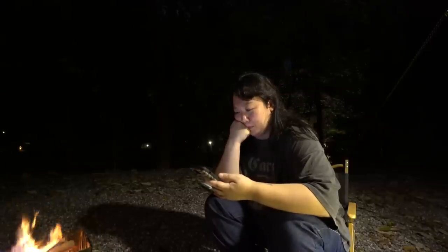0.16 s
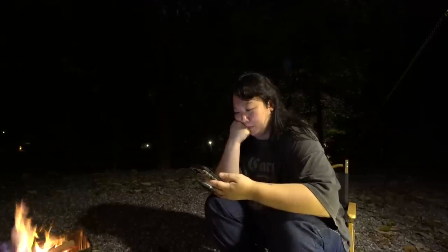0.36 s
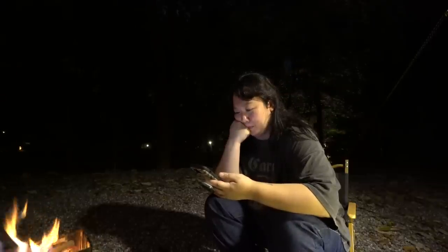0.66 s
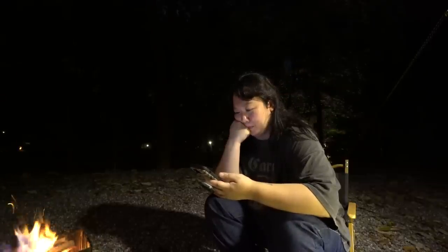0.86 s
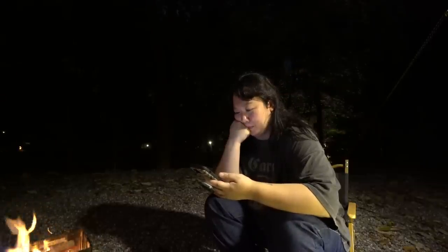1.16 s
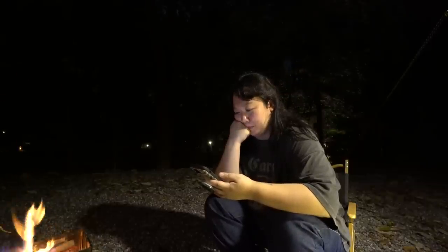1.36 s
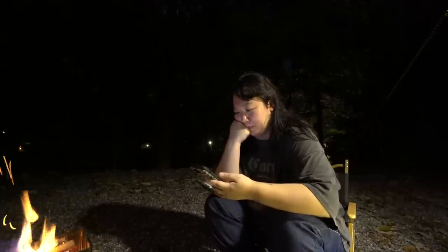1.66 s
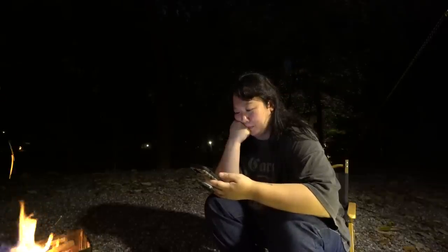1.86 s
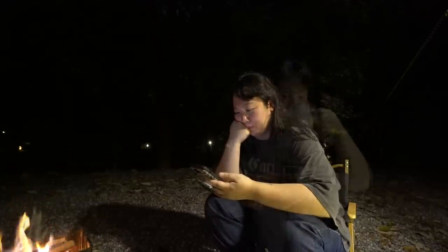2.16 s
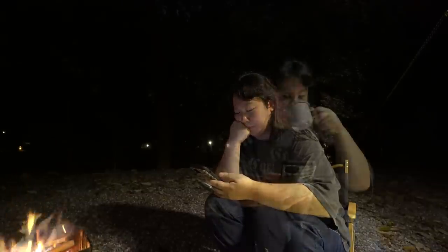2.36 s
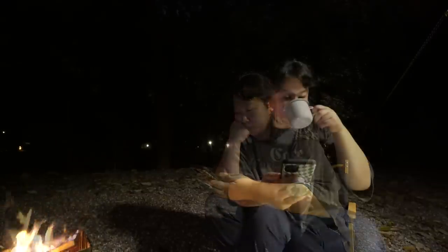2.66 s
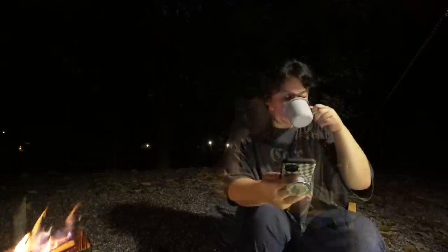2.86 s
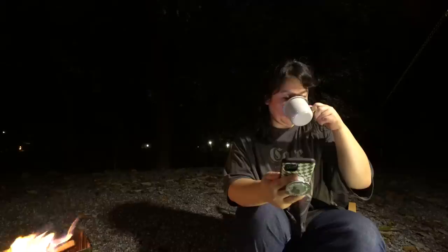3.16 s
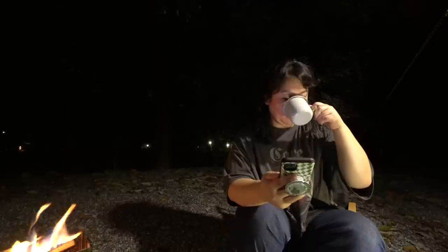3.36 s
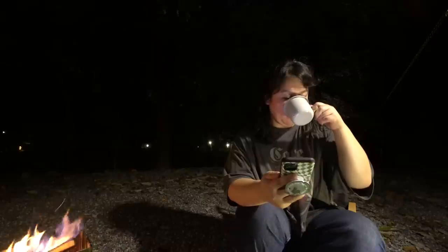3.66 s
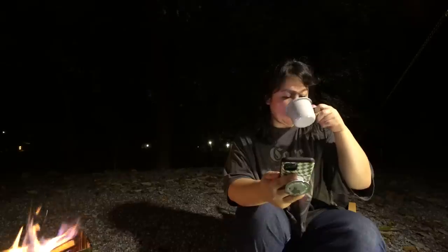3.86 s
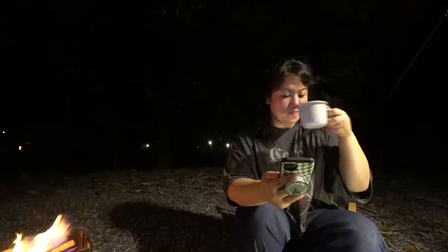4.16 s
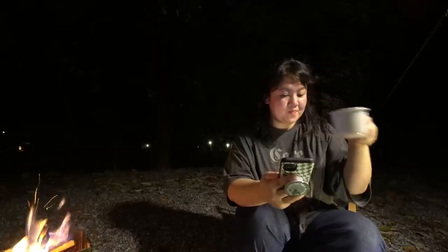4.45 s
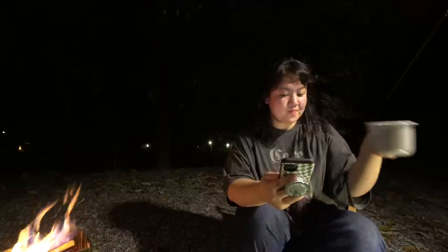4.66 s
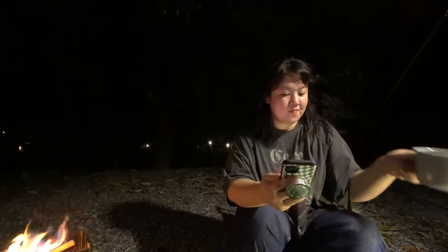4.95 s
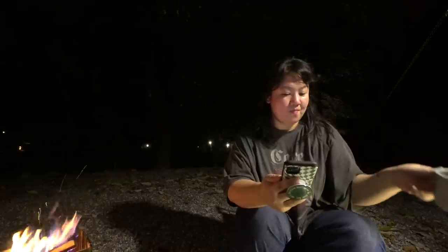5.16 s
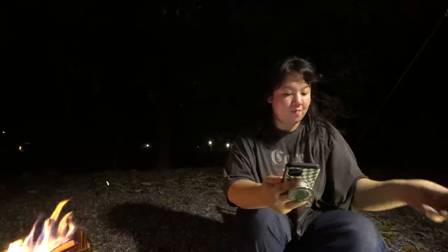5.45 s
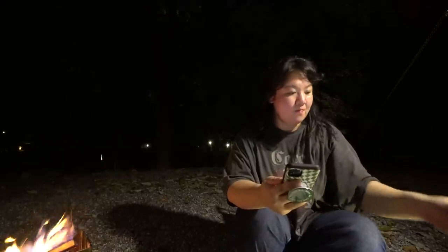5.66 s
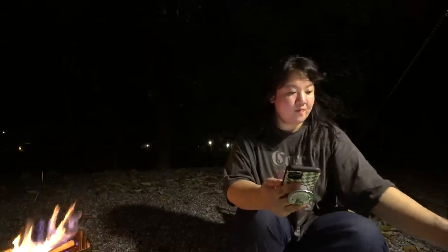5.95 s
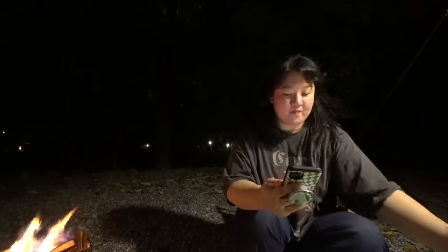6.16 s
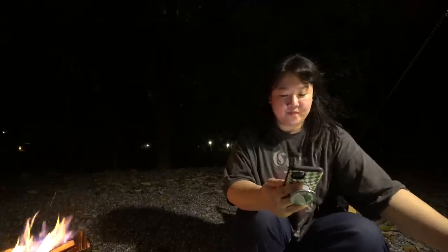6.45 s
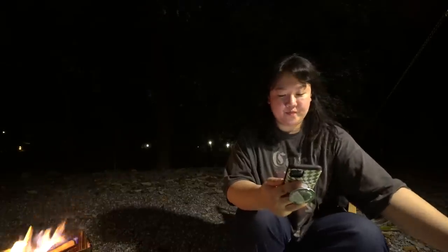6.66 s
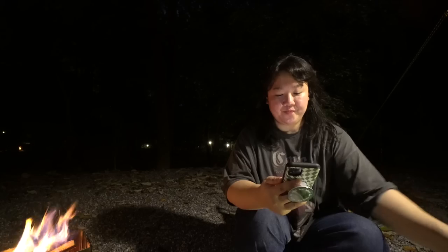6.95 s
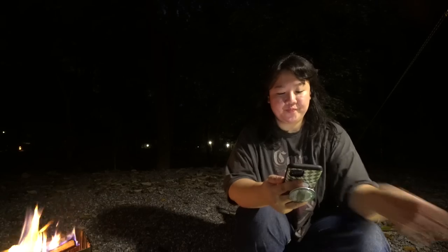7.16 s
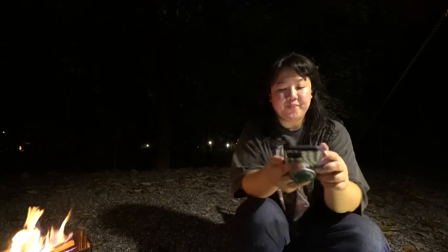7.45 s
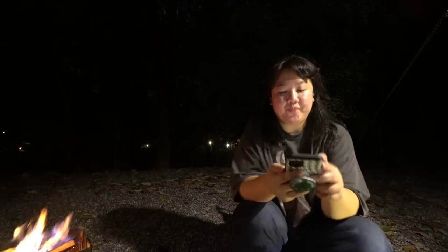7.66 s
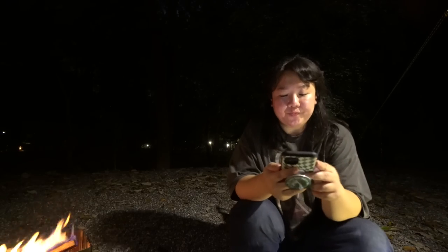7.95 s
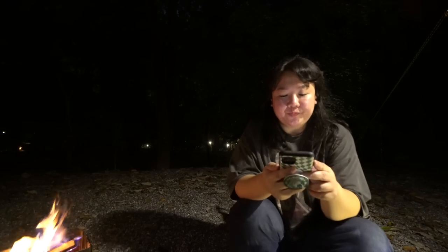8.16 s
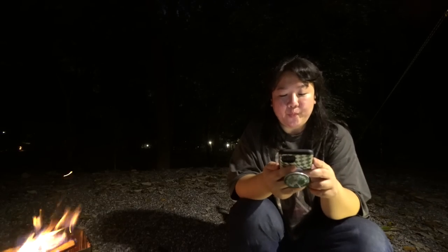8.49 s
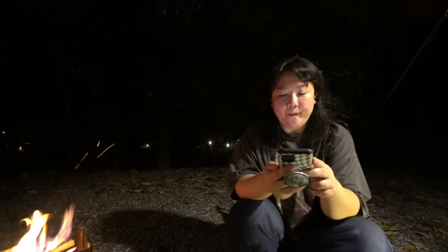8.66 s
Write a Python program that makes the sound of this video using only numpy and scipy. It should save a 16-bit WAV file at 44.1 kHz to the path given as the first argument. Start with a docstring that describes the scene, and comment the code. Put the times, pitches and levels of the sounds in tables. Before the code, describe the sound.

Close microphone beside a campfire in an open, barely reverberant clearing. Loud cracks are frequent in the first two and a half seconds, then sparser, with hard snaps around five and nearly seven seconds. Continuous cricket chorus, a fine high trill, falling katydid buzzes and a nearer chirper surround it. Distant engines hum beneath tyre rush and faint hiss. Late on, a hard mug rubs gritty ground briefly, then a soft hollow knock sounds.

```python
"""Campfire among night insects

A campfire pops and ticks over fluttering flames: each pop sums decaying modes and filtered noise bursts.
A mug scrapes, as noise and grit exciting its modes, and two soft knocks are heard.
Crickets are gliding near sines, massed crickets narrow noise bands, katydids trains of tone packets.
A far road adds shaped-noise rush and rumble with engine drones, over a faint even hiss.
The loudest pops overload the microphone."""
import sys
import numpy as np
from scipy import signal
from scipy.fft import rfft, irfft, next_fast_len
from scipy.io import wavfile
from scipy.ndimage import uniform_filter1d

SR = 44100
rng = np.random.default_rng(int(sys.argv[2]) if len(sys.argv) > 2 else 0)


def waveform_to_disk(signal):
    """Save audio, clipped to [-1, 1], as 16-bit WAV at the path in sys.argv[1]."""
    frames = np.transpose(np.atleast_2d(signal))
    scaled = np.clip(frames, -1, 1) * 32767
    samples = np.round(scaled).astype(np.int16)
    wavfile.write(sys.argv[1], SR, samples)


N = 388962
TIME = np.arange(N) / SR


def from_db(db):
    """Logarithmic level: twenty decibels are a factor of ten in amplitude."""
    return 10 ** (np.asarray(db) / 20)


def rms_one(x):
    """Power normalisation: scale to a root mean square of 1."""
    return x / np.sqrt(np.mean(x ** 2) + 1e-20)


def in_time(rows):
    """Linear interpolation: each column after the first, at every sample."""
    s, *columns = np.transpose(rows)
    return [np.interp(TIME, s, column) for column in columns]


def add(out, s, sound):
    """Superposition: mix a sound in at time s."""
    at = int(np.clip(round(s * SR), 0, N))
    out[at:at + len(sound)] += sound[:N - at]


def drift(rate):
    """Random modulation of rms 1: 4096 values at the given rate (Hz), the last one then held."""
    knots = rng.standard_normal(4096)
    return rms_one(np.interp(TIME * rate, np.arange(len(knots)), knots))


def shaped_noise(gain_at):
    """Spectral shaping: white noise weighted by a function of frequency, at rms 1."""
    size = next_fast_len(N)
    hz = np.maximum(np.fft.rfftfreq(size, 1 / SR), 1)
    spectrum = rfft(rng.standard_normal(size)) * gain_at(hz)
    return rms_one(irfft(spectrum, size)[:N])


def coloured(points):
    """Spectral envelope: noise through (frequency_hz, level_db) points on a log-frequency axis."""
    at, db = np.transpose(points)
    return shaped_noise(lambda hz: from_db(np.interp(np.log(hz), np.log(at), db)))


def ring(t, hz, t60):
    """Damped oscillation: a struck mode falls by 60 dB in t60 seconds."""
    return np.sin(2 * np.pi * hz * t) * from_db(-60 * t / t60)


def band(x, low_hz, high_hz):
    """Resonant selection by a gentle causal band-pass."""
    edges = [low_hz, min(high_hz, .45 * SR)]
    return signal.sosfilt(signal.butter(2, edges, "band", fs=SR, output="sos"), x)


def high_pass(x, hz):
    """First-order high-pass: 6 dB per octave below the corner."""
    return signal.sosfilt(signal.butter(1, hz, "high", fs=SR, output="sos"), x)


def clearing(x, wet_db, t60):
    """Diffuse scattering: ground, chairs and trunks return a thin decaying tail."""
    t = np.arange(SR // 2) / SR
    tail = rng.standard_normal(len(t)) * from_db(-60 * t / t60) * (t > .004)
    return x + from_db(wet_db) * signal.fftconvolve(x, tail / np.linalg.norm(tail))[:N]


def pop(splinter_hz, splinter_t60, thump_db, crack_db, snap_db):
    """Impulsive gas release: thump and crack modes, a ringing splinter, a snap and a rattle of char."""
    t = np.arange(SR // 20) / SR
    grit = rng.standard_normal((2, len(t)))
    thump = from_db(thump_db) * ring(t, hz=950, t60=.0035)
    crack = from_db(crack_db) * ring(t, hz=2000, t60=.0026)
    # neighbouring modes swing in opposite senses
    body = crack - thump - ring(t, splinter_hz, splinter_t60)
    sparkle = band(grit[0], 4660, 8360) + band(grit[1], 10200, 18500)
    snap = from_db(snap_db - 6 - 60 * t / .0086) * sparkle
    rattle = from_db(-18 - 60 * t / .015) * rms_one(band(grit[1], 820, 4900))
    # so small a source radiates little bass
    return high_pass(body + snap + rattle, 250)


# resin pockets bursting: start_s, level_db, splinter_hz,
# thump_db and crack_db (re level), snap_db (re level, before the 6 dB cut in pop)
RESIN_POPS = [(0.0233, 0, 4180, -7, -9, -3), (.1900, -22, 3630, 9, -5, -12),
              (0.3043, 1.5, 3700, -11, -22, -7), (0.3044, 0, 5450, -12, -19, -8),
              (.4513, -4.5, 3640, 1.5, 2, -10), (0.6066, 4, 3450, 2.5, 1.5, -6.5),
              (0.7842, -11.5, 5410, -9, -5, -3), (.8070, -1.5, 5240, -19, -26, -2),
              (1.2083, -14, 3450, 1, 3, -3), (1.4484, 5, 3670, -2.5, -3, -8),
              (1.7620, -11.5, 4010, -7, -3, -4.5), (1.9165, -8, 4084, -13, -20, -2.5),
              (2.3088, -17, 3400, 5, 2, -11), (2.3794, 0, 3500, -3, .5, -2.5),
              (2.4355, -13.5, 3305, -4, -5, -14), (3.0392, -5, 3430, 2.5, 4.5, -10),
              (3.6953, 0, 3660, -2.5, -1, -9.5), (4.2946, -11.5, 3500, 1, 0, -20),
              (4.346, -18, 5550, -8, 0, 2), (5.0156, 5, 3620, -4, -.5, -3), (5.6108, 2.5, 3600, -2, -3, -3),
              (6.7364, 7, 3800, -24, -31, -7), (7.804, -21, 5430, -10, 0, 9),
              (8.2230, -26, 6000, -11, -11, 7)]
# flame flutter spectrum: frequency_hz, level_db (relative)
FLAME_SPECTRUM = [(10, 2), (25, -10.5), (45, -2), (65, -3.5), (90, -9.5), (150, -36), (400, -24.5),
                  (2000, -75)]
SPLINTER_T60_S = .004   # shared by all the loud pops
TICK_COUNT, TICK_LOUDEST_DB, TICK_RANGE_DB = 40, -33, 8


def fire():
    """Random impulsive radiation: timed pops and faint chance ticks over low-frequency flame noise."""
    out = np.zeros(N)
    for s, db, hz, thump_db, crack_db, snap_db in RESIN_POPS:
        add(out, s, from_db(db) * pop(hz, SPLINTER_T60_S, thump_db, crack_db, snap_db))
    for when, size, pitch in rng.random(size=(TICK_COUNT, 3)):
        tick = pop(3000 + 3000 * pitch, .003, thump_db=0, crack_db=-2, snap_db=-7)
        add(out, when * N / SR, from_db(TICK_LOUDEST_DB - TICK_RANGE_DB * size) * tick)
    return clearing(out, wet_db=-17, t60=.2) + from_db(-31) * coloured(FLAME_SPECTRUM)


# bursts of scraping force on the mug: start_s, level_db (of the force), t60_s
SCRAPE_BURSTS = [(6.226, -14, .26), (6.283, -25.5, 0.23), (6.415, -28.5, .25), (6.456, -20.5, 0.11),
                 (6.485, -32, 0.76)]
# spectrum of the rubbing noise: frequency_hz, level_db (relative)
RUB_SPECTRUM = [(400, -5), (1000, 2.5), (1700, -16), (2100, -8), (2450, -4), (2800, -5), (3350, -7),
                (4500, -5), (7000, -12), (10000, -18), (16000, -25)]
# modes of the mug: frequency_hz, level_db (relative), t60_s
MUG_RESONANCES = [(2130, -2.5, 0.021), (2270, -0.5, 0.014), (2788, 3, 0.022), (3360, 3, 0.032),
                  (4420, -9, .015), (7200, -13, .008)]
# soft hollow knocks: start_s, pitch_hz, level_db (before the softened onset), t60_s
SOFT_KNOCKS = [(3.855, 900, -7, 0.028), (7.7478, 550, -2.5, 0.022)]
RUB_DB, MUG_RING_DB, GRAINS_PER_S = -2, -4, 2500


def handling():
    """Frictional excitation: scraping force drives noise and grit, the grit rings the mug; knocks are modes."""
    t, force = np.arange(SR // 2) / SR, np.zeros(N)
    for s, db, t60 in SCRAPE_BURSTS:
        add(force, s, from_db(db - 60 * t / t60) * (1 - np.exp(-t / .0008)))
    # this drift ends after 2 s, so the later scrapes share one random offset
    rub = rms_one(coloured(RUB_SPECTRUM) * from_db(4 * drift(2000)))
    out = from_db(RUB_DB) * force * rub
    grains = rng.standard_normal(N) * (rng.random(N) < GRAINS_PER_S / SR)
    grit = force * rms_one(grains)
    mug = sum(from_db(db) * ring(t, hz, t60) for hz, db, t60 in MUG_RESONANCES)
    out += from_db(MUG_RING_DB) * signal.fftconvolve(grit, mug / np.linalg.norm(mug))[:N]
    for s, hz, db, t60 in SOFT_KNOCKS:
        soft_onset = 1 - np.exp(-t / .0024)
        add(out, s, from_db(db) * ring(t, hz, t60) * soft_onset)
    return out


# bouts of slow and of quick chirps: first_s, last_s, period_s, level_db (mean of the chirps' peaks)
CHIRP_BOUTS = [(2.457, 2.78, .074, -34), (2.84, 3.2, .055, -32), (3.253, 3.62, 0.083, -28.5),
               (3.72, 4.2, .051, -31), (4.266, 4.55, .051, -30.5), (4.609, 5.06, 0.087, -29.5),
               (5.17, 5.47, .052, -32), (5.534, 5.81, 0.083, -29), (5.881, 6.36, 0.046, -30),
               (6.419, 6.69, .082, -29), (6.773, 7.25, .0505, -29.5), (7.298, 7.83, .087, -29.5),
               (7.869, 8.05, .049, -30), (8.111, 8.44, .051, -30.5), (8.534, 8.81, .05, -31)]
QUICK_PERIOD_S, DUTY = .05, .57   # the duty is the sounding share of a period
CHIRP_TOP_HZ, CHIRP_END_HZ = 3540, 3343   # at the quick pace
# per doubling of the period: longer strokes sweep wider, and the bout's pitch arches up and back
TOP_RISE_HZ, END_DROP_HZ, ARCH_HZ = 222, 150, 120


def near_cricket():
    """Stridulation: each wing stroke is a near sine that falls in pitch as the wing slows."""
    out = np.zeros(N)
    for first, last, period, db in CHIRP_BOUTS:
        slowness = np.log2(period / QUICK_PERIOD_S)
        top_hz = CHIRP_TOP_HZ + TOP_RISE_HZ * slowness
        end_hz = CHIRP_END_HZ - END_DROP_HZ * slowness
        stroke = np.linspace(0, 1, int(DUTY * period * SR))
        glide_hz = top_hz + (end_hz - top_hz) * stroke ** 1.174
        for s, chance in zip(np.arange(first, last, period), rng.standard_normal(size=(32, 3))):
            arch_hz = ARCH_HZ * slowness * np.sin(np.pi * (s - first) / (last - first))
            hz = glide_hz + arch_hz + 15 * chance[0]
            chirp = np.sin(np.pi * stroke) * np.sin(2 * np.pi * np.cumsum(hz) / SR)
            start = s - DUTY * period / 2 + .001 * chance[1]
            add(out, start, from_db(db + 1.6 * chance[2]) * chirp)
    return clearing(out, wet_db=-10, t60=.25)


TRILL_HZ, TRILL_PERIOD_S, TRILL_PEAK_S, TRILL_DB = 5850, .05276, .039, -49


def high_cricket():
    """Amplitude and frequency modulation: an unbroken trill of slightly falling pulses."""
    hz = TRILL_HZ + 10 * drift(.97)
    stroke = ((TIME - TRILL_PEAK_S) / TRILL_PERIOD_S + .5 + .03 * drift(1.795)) % 1
    pulse_hz = hz - 70 * (stroke - .5) + 45 * drift(400)
    tone = np.sin(2 * np.pi * np.cumsum(pulse_hz) / SR)
    song = np.sin(np.pi * stroke) ** 5 * tone * from_db(.8 * drift(15))
    return from_db(TRILL_DB) * rms_one(clearing(song, wet_db=-13, t60=.15))


def buzz(length, first_hz, last_hz, glide_s, rate, strike_s):
    """Tooth-strike excitation: brief packets of a wing tone that sinks unevenly; rms 1."""
    t = np.arange(SR // 250) / SR
    out = np.zeros(int(length * SR) + len(t) + SR // 100)
    wander_hz, surge_db = 170 * drift(25), 2 * drift(20)
    pace = rate * (1 + .008 * rng.standard_normal())
    for s, chance in zip(np.arange(0, length, 1 / pace), rng.standard_normal(size=(256, 2))):
        at = int(s * SR)
        glide = np.cos(np.pi / 2 * min(s / glide_s, 1)) ** 2
        hz = last_hz + (first_hz - last_hz) * glide + wander_hz[at]
        swell = np.sin(np.pi * (s / length) ** 1.07)   # rises and dies away over the buzz
        force = swell * from_db(.5 * chance[0] + surge_db[at])
        lag = t - t[-1] / 2 + at / SR - s   # the packet is centred between samples
        tone = np.cos(2 * np.pi * hz * lag + .5 * chance[1])
        out[at:at + len(t)] += force * np.exp(-np.abs(lag) / strike_s) * tone
    return rms_one(out)


# long falling buzzes of one katydid: start_s, length_s, level_db (rms before scattering)
LONG_BUZZES = [(0.358, .68, -48.5), (2.258, 0.44, -56.5), (2.994, 0.72, -50), (4.609, 0.67, -47),
               (6.202, 0.64, -46.5), (7.637, 0.72, -47.5)]
# short lisps of a second katydid: start_s, pitch_hz (middle of the fall)
SHORT_LISPS = [(.23, 10100), (.96, 10200), (1.44, 10280), (1.95, 10100), (7.12, 11300), (7.95, 10500)]
BUZZ_FIRST_HZ, BUZZ_LAST_HZ, BUZZ_GLIDE_S, BUZZ_STRIKES_PER_S = 13200, 11530, .46, 290
LISP_S, LISP_FALL_HZ, LISP_STRIKES_PER_S, LISP_DB = .16, 350, 310, -51.5


def katydids():
    """Pulse-train stridulation: one katydid sings long falling buzzes, another short lisps."""
    out = np.zeros(N)
    for start, length, db in LONG_BUZZES:
        call = buzz(length, BUZZ_FIRST_HZ, BUZZ_LAST_HZ, BUZZ_GLIDE_S, BUZZ_STRIKES_PER_S, strike_s=.00033)
        add(out, start, from_db(db) * call)
    for start, hz in SHORT_LISPS:
        first_hz, last_hz = hz + LISP_FALL_HZ / 2, hz - LISP_FALL_HZ / 2
        lisp = buzz(LISP_S, first_hz, last_hz, LISP_S, LISP_STRIKES_PER_S, strike_s=.00012)
        add(out, start, from_db(LISP_DB) * lisp)
    # scattering in the leaves makes the partials uneven
    return clearing(out, wet_db=-6, t60=.06)


# bands of massed far crickets: pitch_hz, width_hz, level_db (before the swell), flutter_db (sign immaterial)
CRICKET_BANDS = [(2614, 53, -51, 3), (2744, 15, -58.5, -4), (2655, 144, -48.5, -1), (3499, 15, -44.5, -1),
                 (3566, 320, -38.5, 0.84), (3730, 50, -50, 2.5), (4350, 250, -43, 2.5), (4605, 276, -37, 1),
                 (5620, 260, -51.5, 2.5)]
# swell of the massed crickets: time_s, level_db (only its course about the mean is used, times 0.94)
CRICKET_SWELL = [(0.0, -34.5), (0.39, -32), (4.27, -32.5), (4.42, -31), (6.76, -30.5), (7.05, -31),
                 (8.82, -31.5)]


def chorus():
    """Incoherent summation: many far crickets merge into fluttering narrow bands of noise."""
    out = np.zeros(N)
    for centre, width, level_db, flutter_db in CRICKET_BANDS:
        voices = shaped_noise(lambda hz: np.exp(-.5 * ((hz - centre) / width) ** 2))
        out += from_db(level_db) * rms_one(voices * from_db(flutter_db * drift(55)))
    db, = in_time(CRICKET_SWELL)
    return out * from_db(.94 * (db - np.mean(db)))


def engine(rows, half_order_db):
    """Periodic combustion: a far exhaust drones at its firing rate, with a weaker line an octave below."""
    hz, db = in_time(rows)
    phase = 2 * np.pi * np.cumsum(hz + drift(8)) / SR
    sounding = (TIME >= rows[0][0]) & (TIME <= rows[-1][0])
    heard = uniform_filter1d(1. * sounding, size=4410)   # fades of 0.1 s
    tone = np.sin(phase) + from_db(half_order_db) * np.sin(phase / 2)
    return heard * from_db(db + drift(10)) * np.sqrt(2) * tone


# traffic on the far road: time_s, tyre_rush_db, rumble_db (both before the trims below)
TRAFFIC = [(0.0, -33, -32.5), (0.42, -33, -33), (0.86, -33.5, -32.5), (1.2, -32.5, -33), (1.77, -33, -29.5),
           (2.01, -33, -33.5), (2.8, -34, -31.5), (3.19, -29.5, -31), (3.66, -30.5, -28.5),
           (3.93, -35, -30.5), (4.27, -32, -30), (6.11, -31.5, -30), (6.24, -31.5, -29), (7.47, -28, -29),
           (8.06, -31, -29), (8.82, -30.5, -31)]
# tyre rush spectrum: frequency_hz, level_db (relative)
TYRE_SPECTRUM = [(250, -9), (400, -6.5), (600, -8.5), (780, -1.5), (950, 3), (1200, -5.5), (1600, -13),
                 (2300, -20.5), (4000, -29.5), (8000, -38)]
# rumble spectrum: frequency_hz, level_db (relative)
RUMBLE_SPECTRUM = [(20, -3.5), (60, -2.5), (100, 1), (190, -3), (260, -6), (350, -13), (600, -21),
                   (1500, -44)]
# drone of a far engine: time_s, firing_rate_hz, level_db (rms of the firing line)
ENGINE_DRONE = [(0.1, 131.2, -29.5), (0.27, 131.2, -40), (0.97, 131.2, -21.5), (1.13, 131, -31.5),
                (1.16, 131.3, -45), (1.57, 130.8, -24.5), (1.83, 132.6, -35), (1.93, 131.1, -27),
                (2.13, 129.9, -38.5), (2.22, 131.3, -27), (2.55, 131.1, -38)]
# a second, faster engine swells out of the rumble and sinks back: peak_s, firing_rate_hz, level_db
FAST_ENGINE_SWELLS = [(3.65, 170.5, -31.5), (6.92, 167.5, -33), (8.62, 167, -29)]
TYRE_TRIM_DB, RUMBLE_TRIM_DB = 2, 3.5
SWELL_RISE_S, SWELL_FALL_S, SWELL_DEPTH_DB = .33, .6, 11


def road():
    """Broadband and tonal radiation: tyre rush, rumble and engine drones from far off."""
    rush_db, low_db = in_time(TRAFFIC)
    out = from_db(rush_db + TYRE_TRIM_DB) * coloured(TYRE_SPECTRUM)
    out += from_db(low_db + RUMBLE_TRIM_DB) * coloured(RUMBLE_SPECTRUM)
    for s, hz, db in FAST_ENGINE_SWELLS:
        start = (s - SWELL_RISE_S, hz, db - SWELL_DEPTH_DB)
        end = (s + SWELL_FALL_S, hz, db - SWELL_DEPTH_DB)
        out += engine([start, (s, hz, db), end], half_order_db=-9.5)
    return out + engine(ENGINE_DRONE, half_order_db=-6)


# hiss spectrum: frequency_hz, level_db (relative)
HISS_SPECTRUM = [(300, -8), (2000, 5.5), (5000, 9.5), (6500, 4), (9000, -2), (12000, 4), (15500, -0.5)]


def air():
    """Stationary noise: a faint even hiss."""
    return from_db(-44) * coloured(HISS_SPECTRUM)


def scene():
    """Linear superposition: fire close by, insects all round, the road far off and a hiss."""
    insects = near_cricket() + high_cricket() + katydids() + chorus()
    return (fire() + handling() + insects + road() + air())[None, :]


def record(dry):
    """Saturation and band-limiting: peaks flatten at full scale; subsonic sway and the top are cut."""
    steady = high_pass(dry, 8)
    clipped = steady / (1 + steady ** 8) ** (1 / 8)
    return signal.sosfilt(signal.ellip(12, .1, 80, 15800, fs=SR, output="sos"), clipped)


dry = scene()
out = record(dry)
waveform_to_disk(out)
```